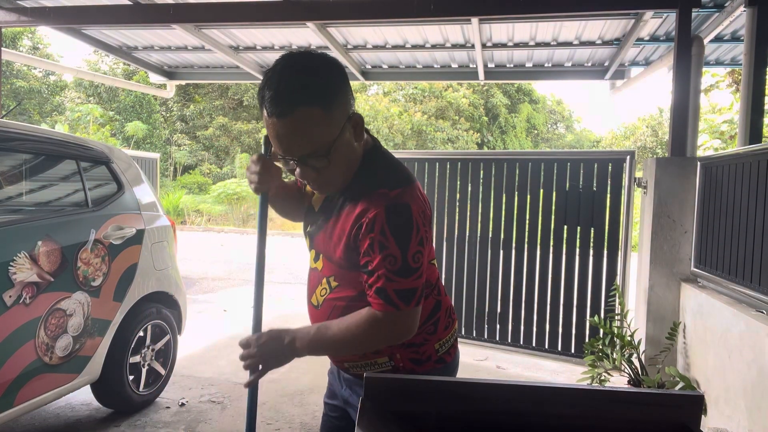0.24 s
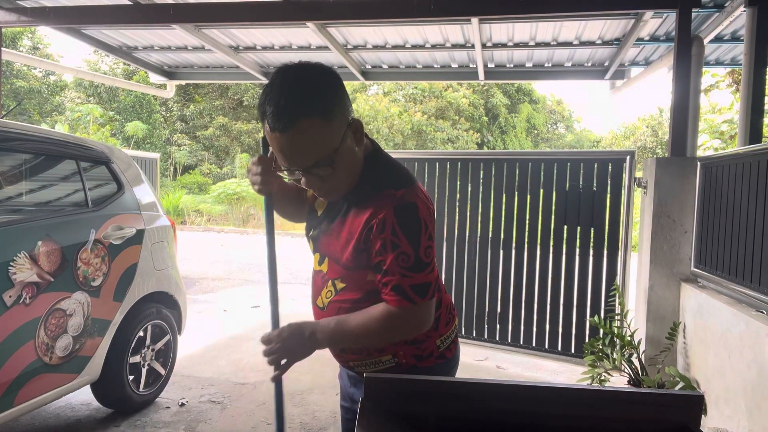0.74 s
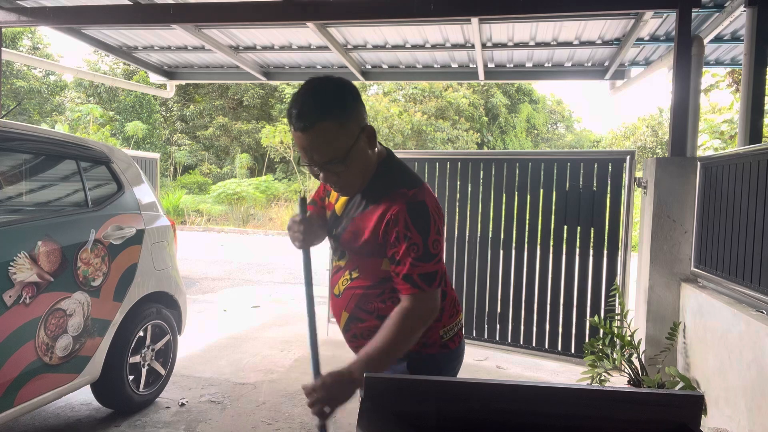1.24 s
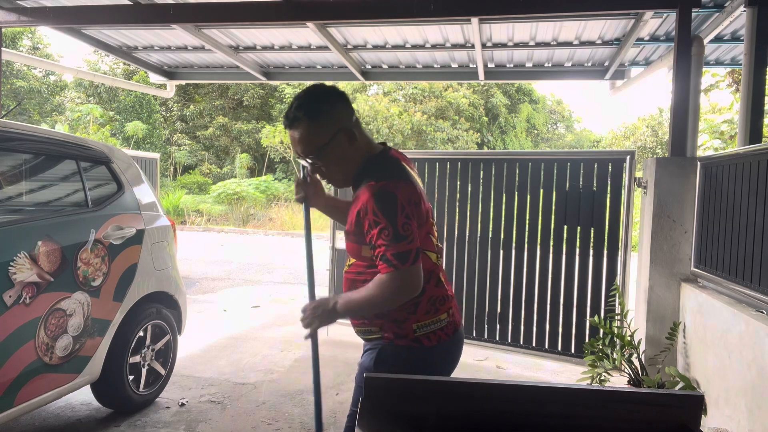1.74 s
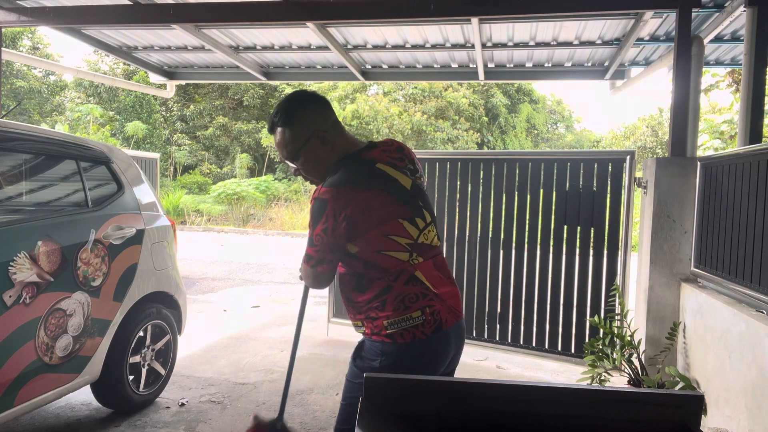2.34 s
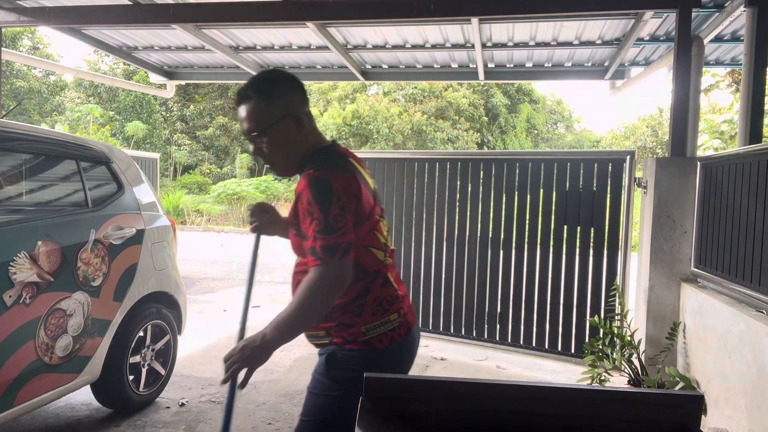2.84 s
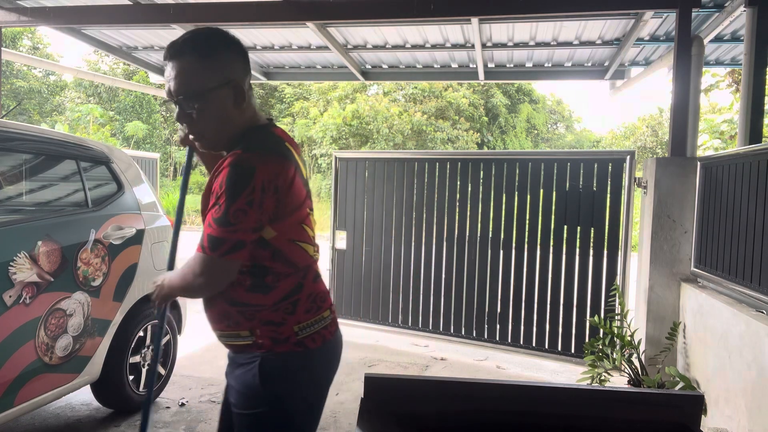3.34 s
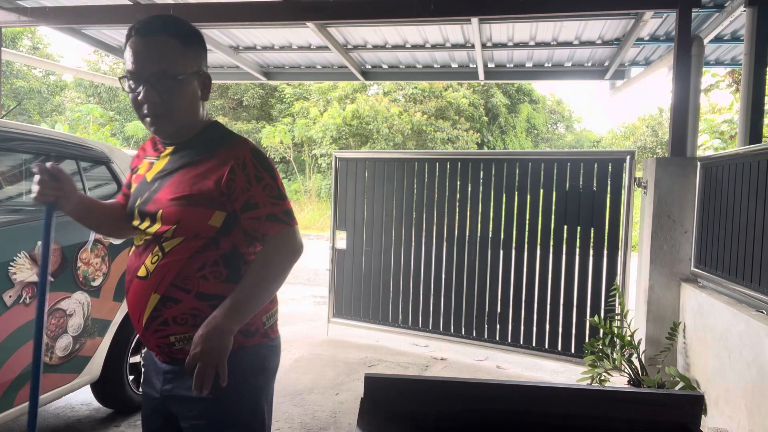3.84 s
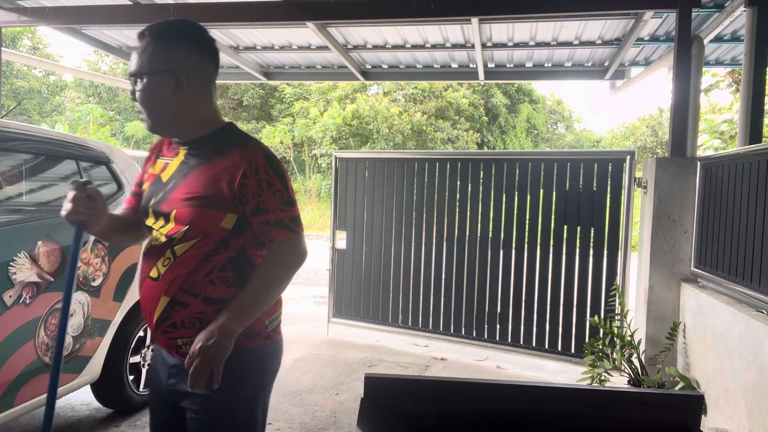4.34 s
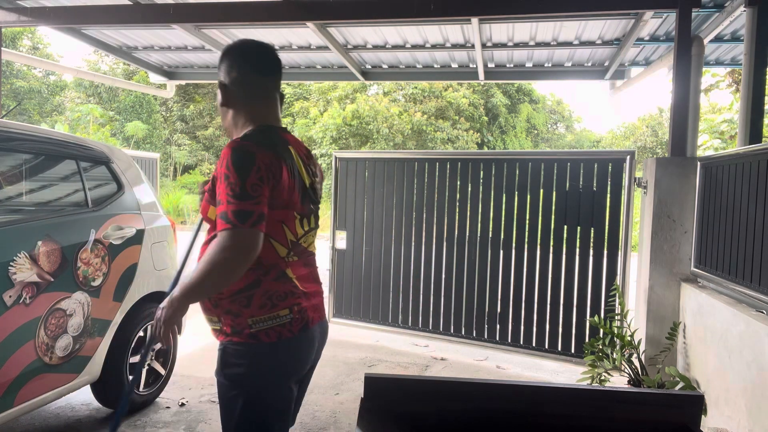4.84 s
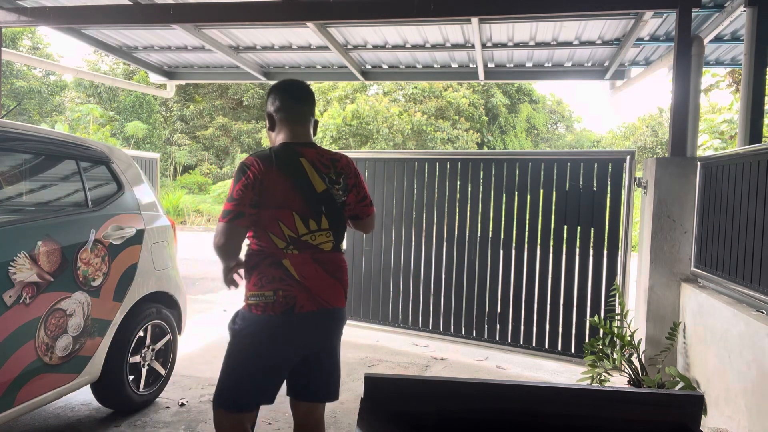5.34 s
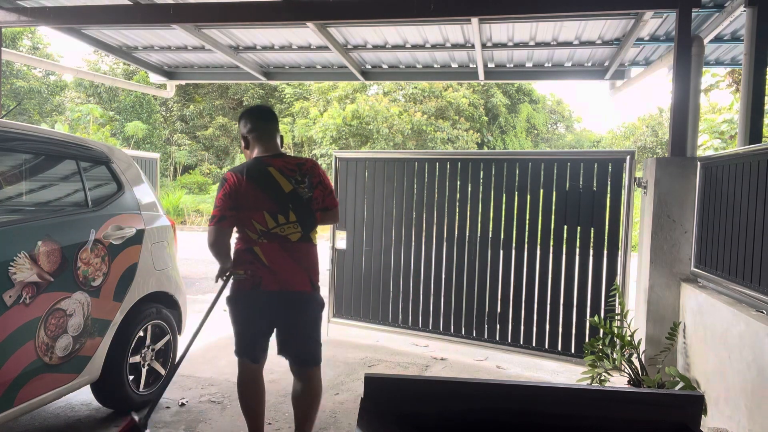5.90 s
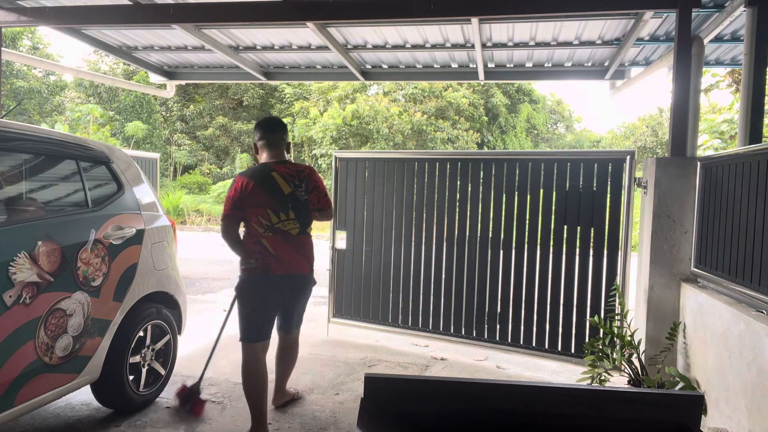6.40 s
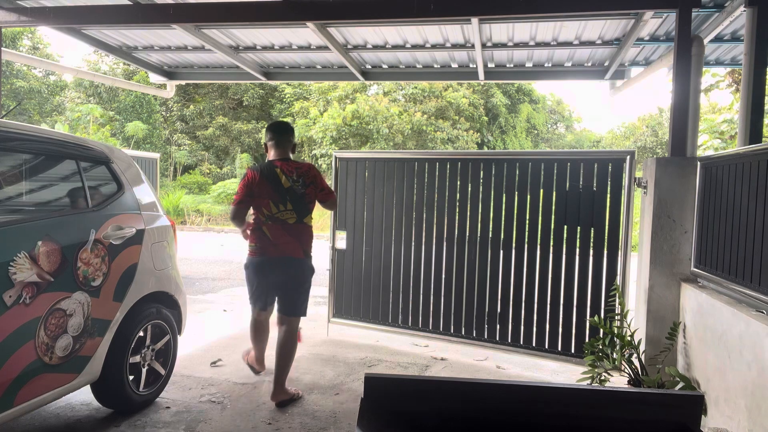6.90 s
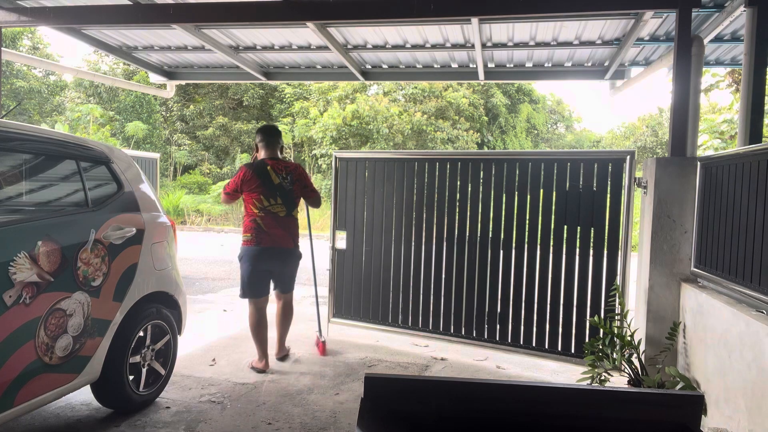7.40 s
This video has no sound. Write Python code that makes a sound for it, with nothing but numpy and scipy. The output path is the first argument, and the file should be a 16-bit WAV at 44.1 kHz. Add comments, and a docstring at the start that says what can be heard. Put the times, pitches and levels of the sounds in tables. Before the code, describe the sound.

A plastic broom sweeps a concrete floor close by in uneven, hissing, scratchy strokes, its hollow head now and then clacking and chattering. Midway the sweeping eases into light brushes, foot scuffs and a heel thud. Strong strokes return near the end, followed by a few soft steps. An air conditioner hums throughout with a thin high whine, and a distant bird chirps faintly. The carport adds only a very short echo.

```python
"""A plastic broom sweeps a concrete floor under a carport roof; the man sweeping then shuffles away.
Thousands of bristles stick and flick on the grit; the hollow head clacks and chatters.
His feet thud and scuff, a bird chirps far off. An air-conditioner hums steadily nearby:
compressor and mains tones, fan noise, a thin inverter whine."""
import sys
import numpy as np
from scipy import signal
from scipy.fft import rfft, irfft, next_fast_len
from scipy.io import wavfile

SR = 44100
rng = np.random.default_rng(int(sys.argv[2]) if len(sys.argv) > 2 else 0)


def transcribe(u):
    """Save the signal u as a 16-bit wav file named by the first command-line argument.

    u: samples, shape (n,) or (channels, n), limited to [-1, 1]; the rate is SR.
    q: integer samples, one column per channel.
    """
    v = np.clip(np.atleast_2d(u).T, -1, 1)
    q = np.round(v * 32767).astype(np.int16)
    wavfile.write(sys.argv[1], SR, q)


N = 337806
TIME_S = np.arange(N) / SR

# broom strokes: start/s, rise/s, time to lift/s, level/dB, scrape over hiss/dB
STROKES = [(-.02, 0.03, 0.1, -12, 2.5), (0.426, 0.074, 0.13, -7.5, 2.5), (0.83, 0.41, 0.6, -6, 0.5),
           (1.904, 0.097, 0.21, 0.5, -4), (1.962, 0.04, 0.047, -13, 8), (2.656, 0.023, 0.036, -17.5, 3),
           (2.869, 0.1, 0.13, -0.5, -2.5), (3.372, 0.068, 0.053, -23.5, 5), (3.601, 0.066, 0.06, -6.5, 1.3),
           (3.75, 0.23, 0.29, -18, -1.5), (4.285, 0.34, 0.46, -19.5, -5.5), (5.076, 0.027, .03, -29, 11),
           (5.155, 0.11, 0.066, -27, 13.5), (5.579, 0.032, 0.052, -16.5, 11),
           (5.775, 0.023, 0.03, -35.5, 18.5), (5.846, 0.1, 0.029, -33, 0), (5.966, 0.66, 0.38, -1, -4.5),
           (6.113, 0.026, .03, -30, 9), (6.2, 0.038, 0.09, -9, -4), (6.342, 0.094, 0.11, 2.5, 0),
           (6.575, 0.026, 0.039, -28.5, 12), (6.763, 0.036, 0.018, -21.5, -9),
           (7.075, 0.038, 0.079, -17.5, 4), (7.365, 0.057, 0.049, -22, 4)]
# faint gritty hiss between strokes: t/s, level/dB
GRIT_LEVEL = [(0, -34.5), (2.5, -33), (3.6, -37), (4.3, -30.5), (5.0, -41), (5.55, -45), (5.8, -28.5),
              (7.66, -36.5)]
# bristle noise: f/Hz, relative density/dB
BRISTLE_SPECTRUM = [(700, -71), (1100, -57), (1900, -54.5), (2800, -52), (3700, -52), (4500, -55.5),
                    (6000, -56.5), (7200, -53), (9000, -60), (11000, -58), (13000, -57.5), (15000, -54.5)]
# compressor (64 Hz) and mains (100 Hz) harmonics, sidebands, inverter whine:
# f/Hz, level before trim/dB, left minus right/dB
HUM_TONES = [(64.2, -42.4, -2), (100, -47.2, 4), (163.6, -42.2, 3), (192.2, -34.8, -3), (200.2, -41.0, 0),
             (227.3, -41.6, -10), (236.3, -45.2, -10), (256, -41.9, -5), (283.8, -32.7, 10),
             (291.3, -40.7, 12), (300, -30.6, 6), (319.9, -34.7, 3), (327.5, -47.9, -15),
             (347.3, -41.5, -8), (355.2, -40.4, -3), (363.4, -45.0, -4), (383.3, -38.6, -3),
             (400.1, -29.7, -1), (447.1, -42.2, 18), (483.9, -45.7, -4), (500, -40.6, 3),
             (547.4, -41.4, -7), (583.3, -44.0, 0), (639.2, -44.0, 2), (675.2, -45.3, 1), (895, -49.7, 10),
             (959, -49.2, 8), (1022.7, -46.7, 7), (1086.9, -45.5, 6), (1150.8, -49.2, -3),
             (1250.3, -51.0, 8), (6899.4, -46.9, 4), (6999.3, -38.4, 7), (7099.3, -54.2, 8)]
# standing waves between wall and car: f/Hz, left phase lead/rad
HUM_PHASE = [(60, -1), (400, 1), (450, 2), (1000, 3.5), (1090, 1.5), (7000, 1.67)]
# fan and outdoor air: f/Hz, relative density/dB
FAN_SPECTRUM = [(25, -61), (45, -56.5), (65, -51.5), (82, -60.5), (125, -53.5), (175, -51), (250, -61.5),
                (390, -52.5), (600, -56.5), (1100, -61.5), (1900, -69.5), (4000, -77.5), (6000, -79.5),
                (7200, -70.5), (8800, -104.5), (14000, -116)]
# fan noise, left against right: f/Hz, correlation (-1..1)
FAN_CORRELATION = [(30, 1), (60, 0.71), (130, 0.89), (330, 0.014), (640, -0.071), (1400, -0.31),
                   (3000, 0.047), (15000, -0.16)]
# slow swell of hum and fan: t/s, gain/dB
DRONE_GAIN = [(0, 1.6), (1.0, 1.5), (1.7, 1), (2.25, -0.5), (2.9, 0.5), (3.6, 1), (4.8, 1.2), (5.6, 1.5),
              (7.66, 1.34)]
# heel thuds: t/s, rise/s, level/dB
THUDS = [(0.016, 0.047, -23), (0.13, 0.016, -27), (0.549, 0.034, -29), (2.549, 0.048, -33),
         (5.366, 0.026, -15.5), (7.026, 0.041, -26), (7.132, 0.018, -25)]
# thud modes: f/Hz, level/dB
THUD_MODES = [(124, -10), (62.5, -24), (102.7, -16.5), (131, -21), (208, -14), (257, -16), (338, -21)]
# bristle and grit snaps: t/s, level/dB, centre f/Hz, fall/s
TICKS = [(0.423, -27.5, 2400, 0.014), (0.951, -24.5, 2240, .007), (2.666, -32, 7000, .004),
         (3.388, -34, 3000, .002), (3.421, -30, 2200, 0.0033), (3.449, -36, 4000, .0015),
         (3.613, -23, 1600, 0.0022), (3.614, -27, 11000, .005), (5.586, -24.5, 4500, .003),
         (5.897, -34, 3180, .0014), (6.393, -28, 5000, .001), (6.452, -15, 4500, .0007),
         (6.462, -22, 5500, .0006), (6.6, -29, 3000, .0014), (6.901, -36, 2400, .0014),
         (7.1435, -23, 1600, .001), (7.146, -32, 7500, 0.0018)]
# bird chirps: t/s, length/s, f/Hz, level/dB
CHIRPS = [(0.8, 0.1, 4560, -45), (2.455, 0.037, 3650, -43), (4.898, 0.11, 5520, -48)]
# modes of the hollow broom head: f/Hz, width/Hz, level/dB
HEAD_MODES = [(390, 45, 4.5), (680, 170, -2), (870, 75, 7), (1050, 120, -.5), (1360, 260, -5),
              (1820, 260, -6.5), (2450, 400, -9), (2800, 300, -15), (3400, 550, -15), (4400, 900, -18),
              (5600, 2000, -23)]
# head dragged: t/s, rise/s, fall/s, level/dB, tilt/(dB/octave)
CHATTERS = [(0.96, .008, 0.03, -24, 3), (1.08, 0.071, 0.06, -17, 2), (1.42, 0.088, 0.061, -24, 0.5),
            (1.625, 0.038, 0.068, -23.5, 3), (2.702, 0.065, 0.075, -28.5, 5),
            (3.46, 0.014, 0.055, -23.5, 2), (5.616, 0.025, 0.072, -26, -0.5)]
# head strikes the floor: t/s, level/dB, tilt/(dB/octave)
CLACKS = [(1.008, -22, 4), (1.044, -20, 4), (1.056, -12, -19), (1.081, -19.5, 7), (1.604, -25.5, 4.5),
          (1.616, -20, 1), (1.623, -23, 5), (1.658, -34, -3), (3.386, -24.5, 1.5), (3.42, -24, 1),
          (3.447, -18, -1), (3.455, -17.5, 1), (3.466, -29, 3), (7.144, -17, -7.5)]
# foot scuffs: t/s, rise/s, level/dB, centre f/Hz, spread/octaves
SCUFFS = [(3.429, 0.027, -26, 1600, 0.52), (4.537, 0.035, -34.5, 1950, 0.33),
          (5.098, 0.026, -34.5, 2800, 0.65), (5.24, 0.024, -28.5, 2000, 0.2),
          (5.903, 0.042, -22, 430, 0.49), (5.9, 0.025, -32.5, 2110, 0.3), (7.02, 0.023, -36.5, 2200, 0.36),
          (7.13, 0.029, -35, 2220, 0.35), (7.418, 0.022, -27, 2550, 0.42)]


def from_db(db):
    """Decibels to gain."""
    return 10 ** (np.asarray(db) / 20)


def unit_rms(x):
    """Scale to rms 1."""
    return x / np.sqrt(np.mean(x ** 2) + 1e-20)


def unit_hit(x, window_s=.01):
    """Scale a hit to the energy of rms 1 over window_s."""
    return x / np.sqrt(np.sum(x ** 2) / (window_s * SR) + 1e-20)


def in_time(rows):
    """Control curve at every sample."""
    return np.interp(TIME_S, *np.transpose(rows))


def at_hz(rows, hz):
    """Read a curve on a log-frequency axis."""
    row_hz, values = np.transpose(rows)
    return np.interp(np.log(hz), np.log(row_hz), values)


def shaped(x, gain_at):
    """Filter by a gain that is a function of frequency."""
    size = next_fast_len(x.shape[-1] + 2048, True)
    hz = np.maximum(np.arange(size // 2 + 1) * SR / size, 1)
    return irfft(rfft(x, size) * gain_at(hz), size)[..., :x.shape[-1]]


def density(spectrum, hz):
    """Gain that gives unit white noise this spectral density."""
    return from_db(at_hz(spectrum, hz)) * np.sqrt(SR / 2)


def drift(corner_hz):
    """Slow random wander, rms about 1."""
    hop, settle = 40, 2000
    pole = np.exp(-2 * np.pi * corner_hz * hop / SR)
    noise = rng.standard_normal(N // hop + settle + 2)
    slow = signal.lfilter([1], [1, -2 * pole, pole * pole], noise)[settle:]
    return np.interp(np.arange(N) / hop, np.arange(len(slow)), unit_rms(slow))


def flicks(per_s, spread_db, size):
    """Tiny slips on grit: random clicks of uneven size, rms 1."""
    slips = rng.random(size) < per_s / SR
    heights = from_db(spread_db * np.minimum(rng.exponential(1, size), 5))
    return unit_rms(slips * heights * rng.choice([-1, 1], size))


def swell(t, rise_s, fall_s):
    """Contact builds up to t = 0, then dies away."""
    return np.exp(-(np.minimum(t, 0) / rise_s) ** 2 - np.maximum(t, 0) / fall_s)


def resonance(hz, centre_hz, width_hz):
    """One damped mode, peak gain 1."""
    return 1 / (1 + 1j * (hz / centre_hz - centre_hz / hz) * centre_hz / width_hz)


def add(out, sound, start_s):
    """Mix a short sound into a track."""
    at = round(start_s * SR)
    first, last = max(at, 0), min(at + len(sound), N)
    out[first:last] += sound[first - at:last - at]


def carport(x, wet_db, t60_s=0.13, right_lag_s=.000182):
    """Direct sound, left ear first, plus a dense tail from roof, wall and car."""
    t = np.arange(int(.7 * SR)) / SR
    tail = rng.standard_normal((2, len(t))) * from_db(-60 * t / t60_s)
    tail /= np.sqrt(np.sum(tail ** 2, axis=1, keepdims=True))
    right = shaped(x, lambda hz: np.exp(-2j * np.pi * hz * right_lag_s))
    direct = np.array([x, right]) * from_db([[.4], [-.4]])
    reverb = signal.fftconvolve(x[None], tail, axes=1)[:, :N]
    wet = from_db(wet_db)
    return (direct + wet * reverb) / np.sqrt(1 + wet ** 2)


def gliding_comb(x, lag_s, gain):
    """Add a copy with a wandering delay: shallow notches glide through the sound."""
    delayed_s = TIME_S - lag_s * np.exp(.15 * drift(3))
    delayed = np.array([np.interp(delayed_s, TIME_S, row) for row in x])
    return (x + gain * delayed) / np.sqrt(1 + gain ** 2)


def stroke_envelopes(hiss_fade_db_per_s=154, scrape_fade_db_per_s=114):
    """Each stroke lands, presses, holds and lifts; returns hiss and scrape amplitudes."""
    hiss_power = from_db(in_time(GRIT_LEVEL)) ** 2
    scrape_power = hiss_power * from_db(-7) ** 2
    t = np.arange(SR) / SR
    for start_s, rise_s, lift_s, db, scrape_db in STROKES:
        press = np.sin(np.pi / 2 * np.clip(t / rise_s, 0, 1)) ** 2
        # bristles slap down just after first touch, harder in sudden strokes
        slap = 0.011 / rise_s * swell(t - 0.016, rise_s=0.0026, fall_s=0.016)
        force = from_db(db) * (press + slap)
        lifted_s = np.maximum(t - lift_s, 0)
        add(hiss_power, (force * from_db(-hiss_fade_db_per_s * lifted_s)) ** 2, start_s)
        add(scrape_power, (force * from_db(scrape_db - scrape_fade_db_per_s * lifted_s)) ** 2, start_s)
    return np.sqrt(hiss_power), np.sqrt(scrape_power)


def broom(crossover_hz=7000, thin_below_hz=2200, direct_share=0.13):
    """Bristles flick in clumps: a high hiss over a coarser, lower scrape that thins in loud strokes."""
    hiss_gain, scrape_gain = stroke_envelopes()
    clumps = from_db(drift(28) + 3.0)
    low_share = lambda hz: 1 / (1 + (hz / crossover_hz) ** 4)
    hiss = hiss_gain * clumps * flicks(per_s=14000, spread_db=-1.5, size=N)
    hiss = shaped(hiss, lambda hz: density(BRISTLE_SPECTRUM, hz) * np.sqrt(1 - low_share(hz)))
    catches = from_db(0.48 * drift(35) - 6.5)   # tufts catch on rough concrete and let go
    slips = np.array([flicks(per_s=4500, spread_db=0.5, size=N) for _ in range(3)])
    scrape = catches * scrape_gain * clumps * slips
    scrape = gliding_comb(scrape, lag_s=.0007, gain=.32)   # wide notches colour the scrape
    scrape = gliding_comb(scrape, lag_s=.0026, gain=.28)   # drifting streaks of colour in the rasp
    scrape = shaped(scrape, lambda hz: density(BRISTLE_SPECTRUM, hz) * np.sqrt(low_share(hz)))
    low_end = shaped(scrape, lambda hz: 1 / (1 + (hz / thin_below_hz) ** 8))
    scrape -= np.clip(0.4 * hiss_gain, 0, .7) * low_end   # fast bristles skim and rasp thinner
    direct = hiss + np.sqrt(direct_share) * scrape[0]
    scattered = np.sqrt(1 - direct_share) * scrape[1:]   # unlike in each ear
    return carport(direct, wet_db=-4.0) + scattered


def hum(hum_trim_db=-0.75, whine_trim_db=-1.1):
    """Compressor, mains and inverter tones: close ones beat, each wavers with the load."""
    out = np.zeros((2, N))
    for hz, db, pan_db in HUM_TONES:
        phase = 2 * np.pi * (hz * TIME_S + rng.random()) + .1 * drift(2)
        trim_db = whine_trim_db if hz > 5000 else hum_trim_db
        pan = unit_rms(from_db([[pan_db / 2], [-pan_db / 2]]))
        amplitude = pan * from_db(db + trim_db + drift(2.9)) * np.sqrt(2)
        out += amplitude * np.sin([phase, phase - at_hz(HUM_PHASE, hz)])
    return out


def fan(hiss_hz=15620, hiss_half_width_hz=110):
    """Rush of air, alike in both ears in the bass, plus a narrow electronic hiss."""
    mid, side = rng.standard_normal((2, N))
    alike = lambda hz: at_hz(FAN_CORRELATION, hz)
    mid = shaped(mid, lambda hz: density(FAN_SPECTRUM, hz) * np.sqrt((1 + alike(hz)) / 2))
    side = shaped(side, lambda hz: density(FAN_SPECTRUM, hz) * np.sqrt((1 - alike(hz)) / 2))
    noise = rng.standard_normal((2, N))
    hiss = shaped(noise, lambda hz: 1 / (1 + ((hz - hiss_hz) / hiss_half_width_hz) ** 2))
    return from_db(-2.5) * np.array([mid + side, mid - side]) + from_db(-47.0) * unit_rms(hiss)


def heel_thuds():
    """A heel rolls on to the floor and shakes a few low, damped modes."""
    out, t = np.zeros(N), np.arange(-SR // 5, SR // 3) / SR
    for at_s, rise_s, db in THUDS:
        body = np.zeros(len(t))
        for hz, mode_db in THUD_MODES:
            detuned_hz = hz * rng.normal(1, 0.044)
            body += from_db(mode_db) * np.sin(2 * np.pi * (detuned_hz * t + rng.random()))
        add(out, from_db(db) * unit_rms(body) * swell(t, rise_s, fall_s=0.05), at_s + t[0])
    return out


def bristle_ticks():
    """Stiff bristles and grit snap on concrete: a brief crack in one broad resonance."""
    out, t = np.zeros(N), np.arange(SR // 20) / SR
    for at_s, db, centre_hz, fall_s in TICKS:
        burst = rng.standard_normal(len(t)) * np.exp(-t / fall_s)
        crack = shaped(burst, lambda hz: resonance(hz, centre_hz, width_hz=1.3 * centre_hz) ** 2)
        add(out, from_db(db) * unit_hit(crack), at_s)
    return out


def bird(half_width_hz=270):
    """Short, distant whistles, blurred into narrow noise bands."""
    out, t = np.zeros(N), np.arange(-SR // 5, SR // 5) / SR
    for at_s, length_s, pitch_hz, db in CHIRPS:
        noise = rng.standard_normal(len(t))
        whistle = shaped(noise, lambda hz: 1 / (1 + ((hz - pitch_hz) / half_width_hz) ** 2))
        envelope = np.exp(-np.minimum(2 * t / length_s, 2) ** 4)
        add(out, from_db(db) * unit_rms(whistle) * envelope, at_s + t[0])
    return out


def head_ring(contacts, tilt_db_per_oct):
    """The plastic head rings; each landing favours other modes and shifts them a little."""
    modes = []
    for k, (mode_hz, width_hz, db) in enumerate(HEAD_MODES):
        mode_hz *= rng.normal(1, .04)
        db += rng.normal(0, 1.5) + tilt_db_per_oct * np.log2(mode_hz / 1000)
        modes.append((mode_hz, width_hz, (-1) ** k * from_db(db)))
    return shaped(contacts, lambda hz: sum(gain * resonance(hz, f, width) for f, width, gain in modes))


def head_chatters():
    """The dragged head skips in a quick run of small contacts."""
    out, t = np.zeros(N), np.arange(-SR // 10, SR // 5) / SR
    for at_s, rise_s, fall_s, db, tilt_db_per_oct in CHATTERS:
        touch = swell(t, rise_s, fall_s)
        ring = head_ring(flicks(per_s=1200, spread_db=4.0, size=len(t)) * touch, tilt_db_per_oct)
        add(out, from_db(db) * unit_rms(ring) * np.sqrt(np.mean(touch ** 2)), at_s + t[0])
    return out


def head_clacks():
    """Single hard contacts with the floor ring the head."""
    out = np.zeros(N)
    for at_s, db, tilt_db_per_oct in CLACKS:
        ring = head_ring(signal.unit_impulse(SR // 10), tilt_db_per_oct)
        add(out, from_db(db) * unit_hit(ring), at_s)
    return out


def foot_scuffs():
    """A foot slides on concrete: a short run of gritty slips in one broad resonance."""
    out, t = np.zeros(N), np.arange(-SR // 10, SR // 5) / SR
    for at_s, rise_s, db, centre_hz, spread_oct in SCUFFS:
        slips = flicks(per_s=3600, spread_db=1.5, size=len(t))
        rasp = shaped(slips, lambda hz: 1 / (1 + (np.log2(hz / centre_hz) / spread_oct) ** 2 / 8) ** 2)
        add(out, from_db(db) * unit_rms(rasp) * swell(t, rise_s, fall_s=0.027), at_s + t[0])
    return out


def scene():
    """Broom, feet and bird in the carport, over the air-conditioner."""
    diffuse = carport(head_chatters() + foot_scuffs() + bird(), wet_db=21.5)
    hits = carport(head_clacks(), wet_db=1.5) + carport(bristle_ticks(), wet_db=7.5)
    return broom() + diffuse + hits + heel_thuds() + from_db(in_time(DRONE_GAIN)) * (hum() + fan())


def record(dry, ceiling=.75, low_cut_hz=30, high_cut_hz=15850):
    """Round the highest peaks; cut the deepest bass and the top."""
    rounded = dry / (1 + np.abs(dry / ceiling) ** 6) ** (1 / 6)
    highpass = signal.butter(3, low_cut_hz, "high", fs=SR, output="sos")
    lowpass = signal.ellip(10, .1, 80, high_cut_hz, fs=SR, output="sos")
    return signal.sosfilt(lowpass, signal.sosfilt(highpass, rounded))


dry = scene()
out = record(dry)
transcribe(out)
```